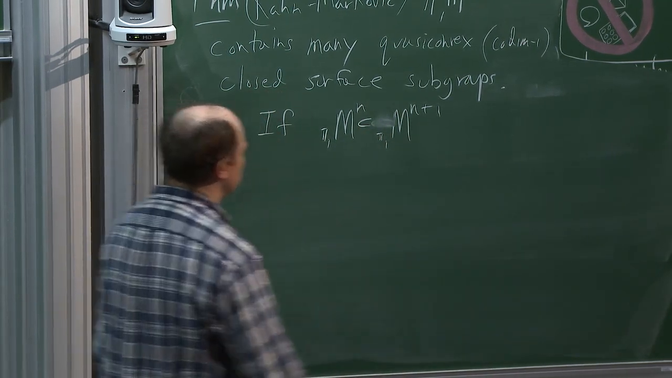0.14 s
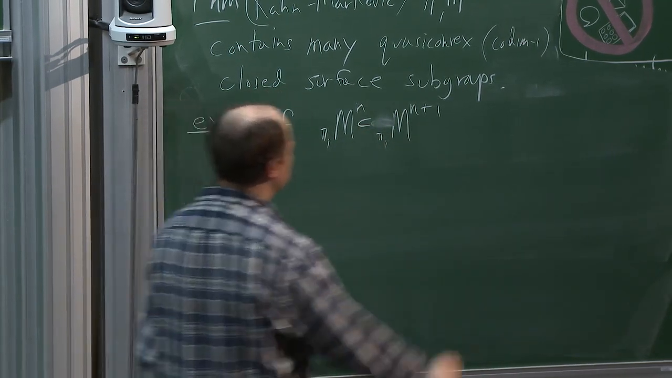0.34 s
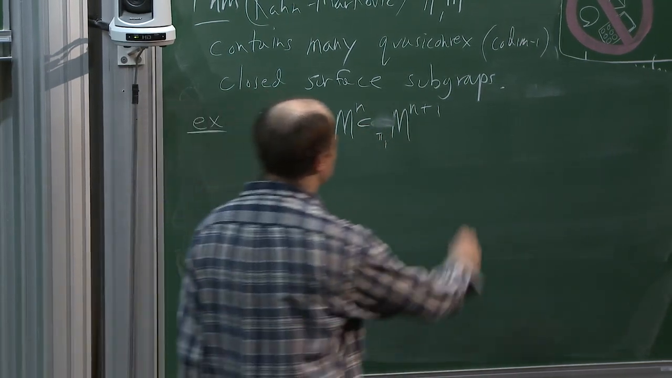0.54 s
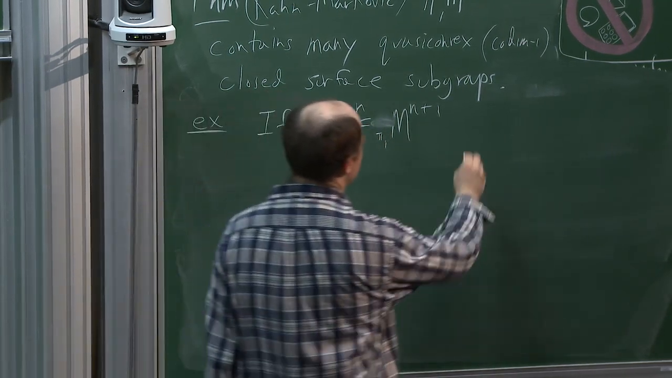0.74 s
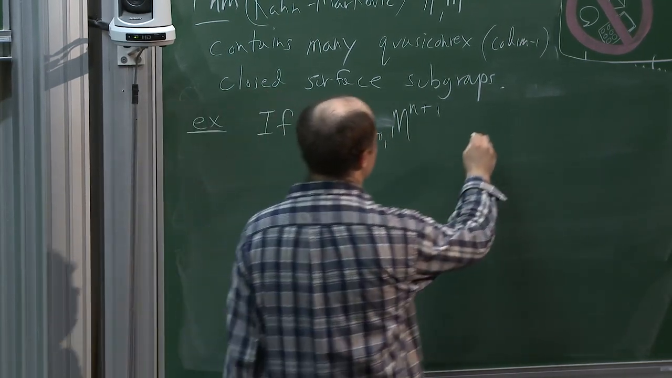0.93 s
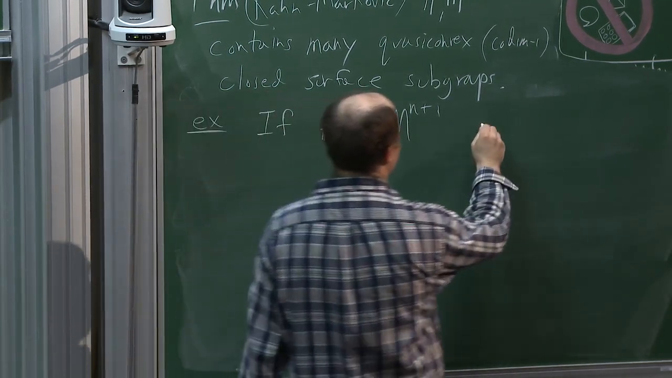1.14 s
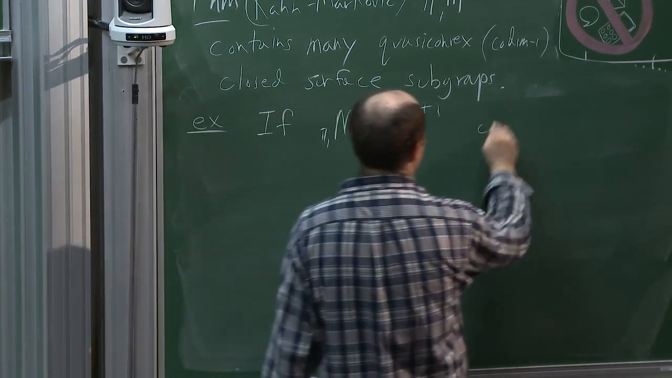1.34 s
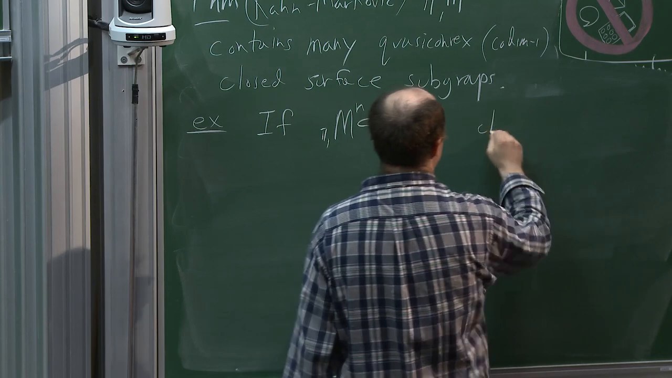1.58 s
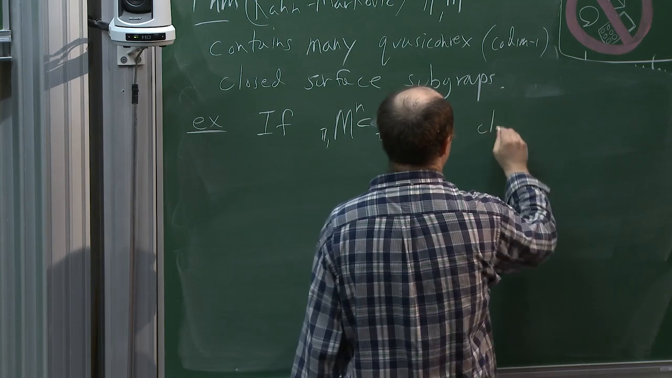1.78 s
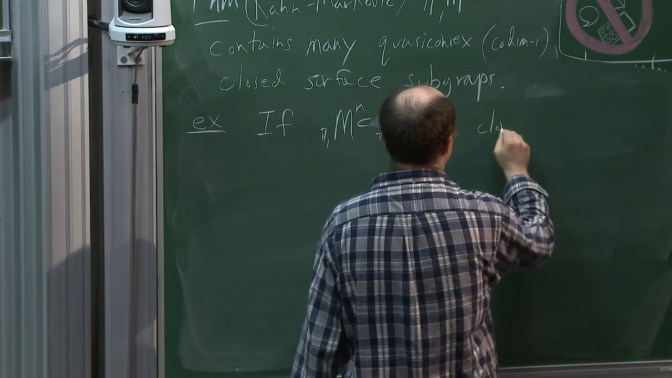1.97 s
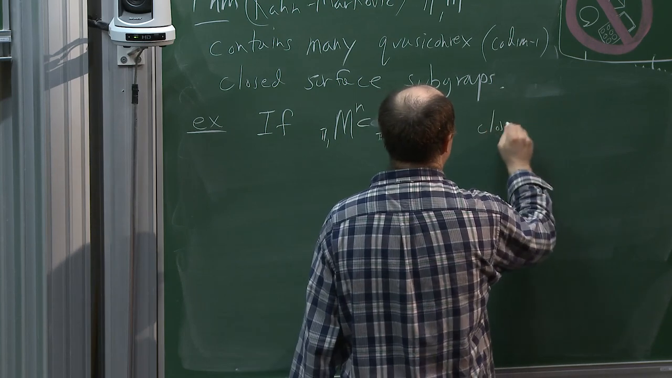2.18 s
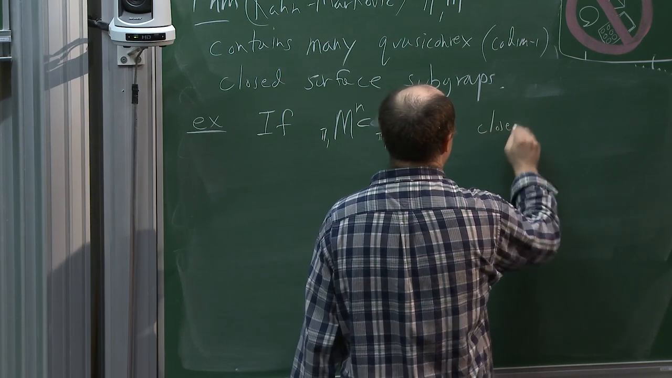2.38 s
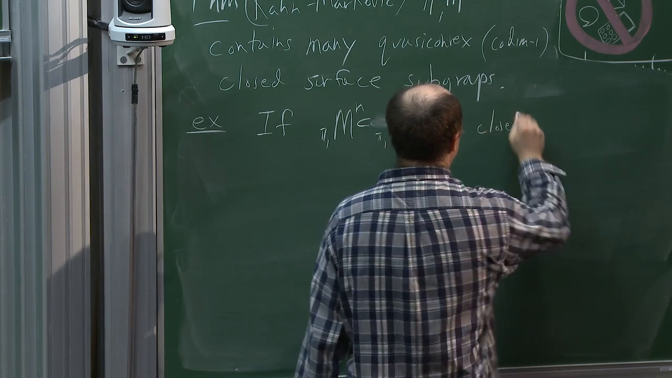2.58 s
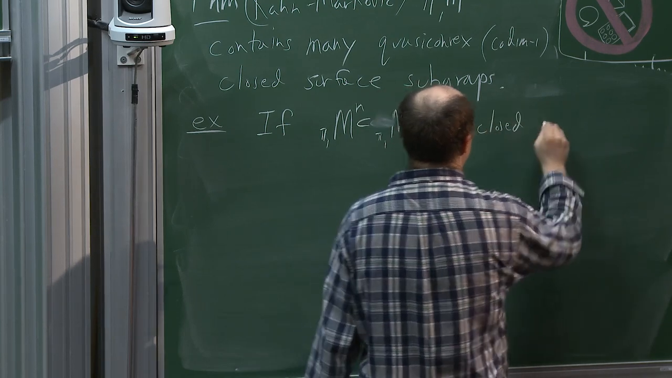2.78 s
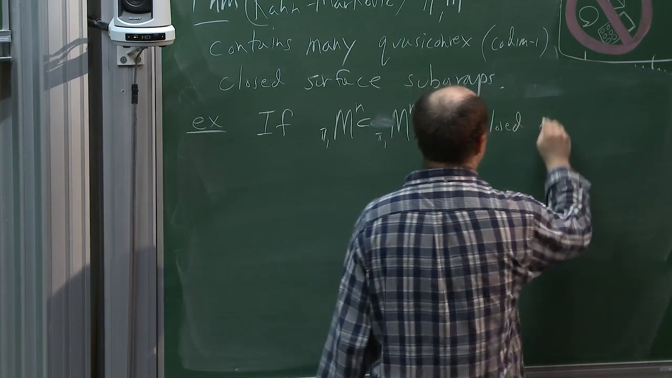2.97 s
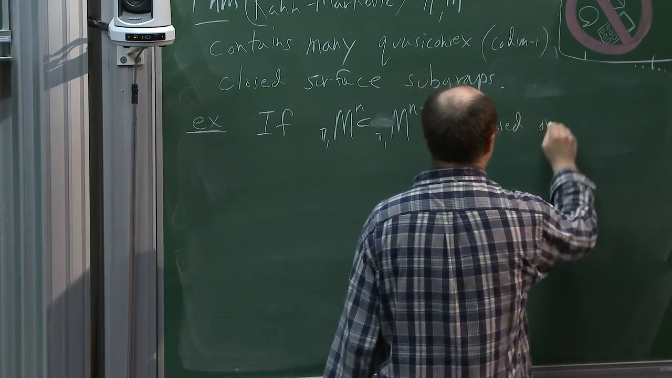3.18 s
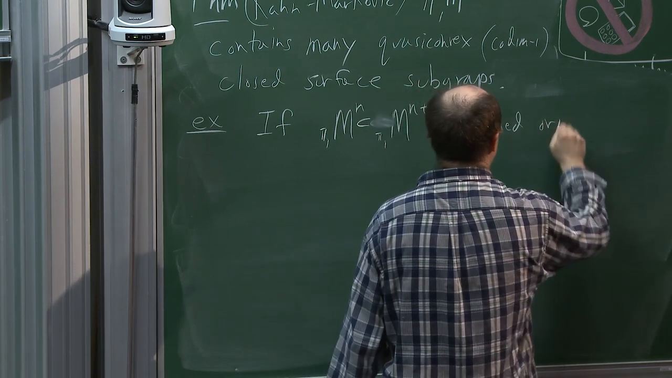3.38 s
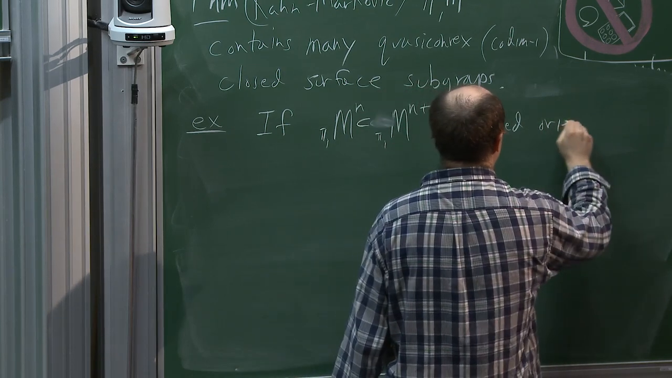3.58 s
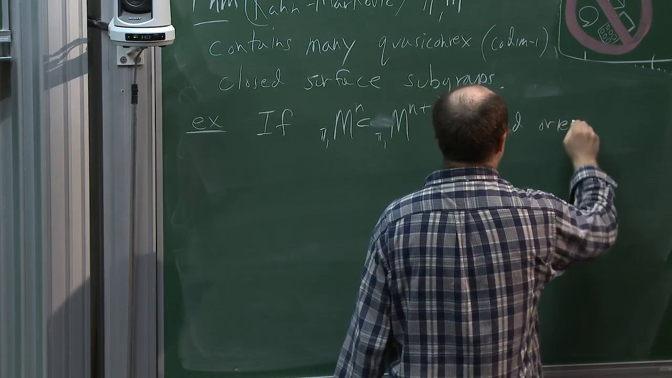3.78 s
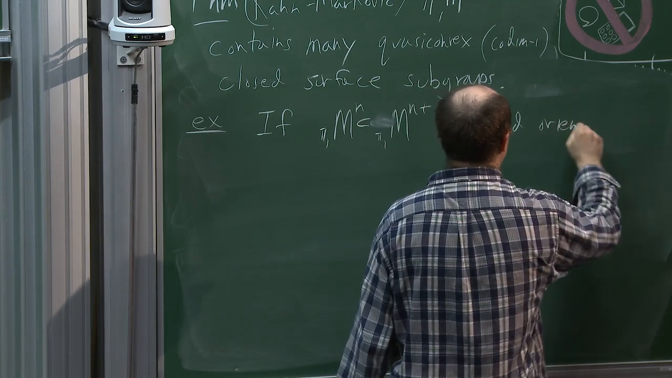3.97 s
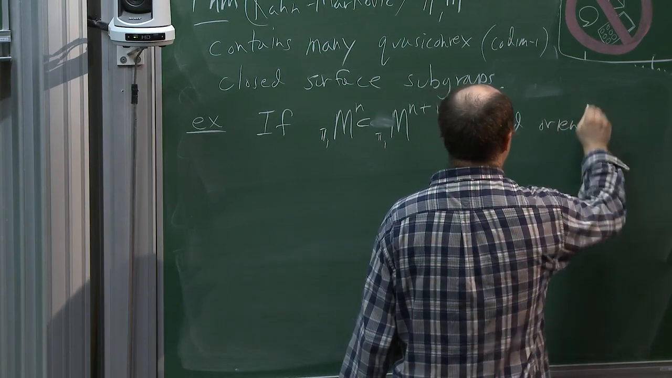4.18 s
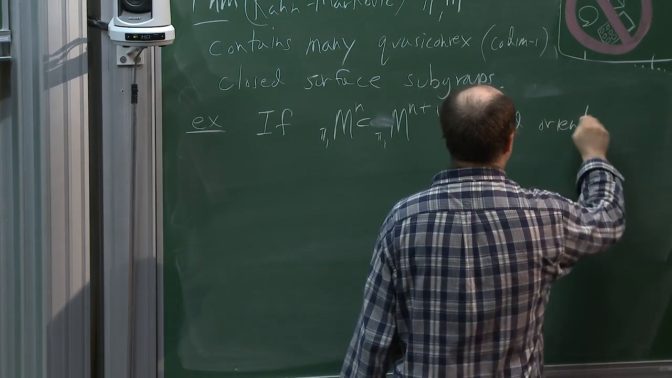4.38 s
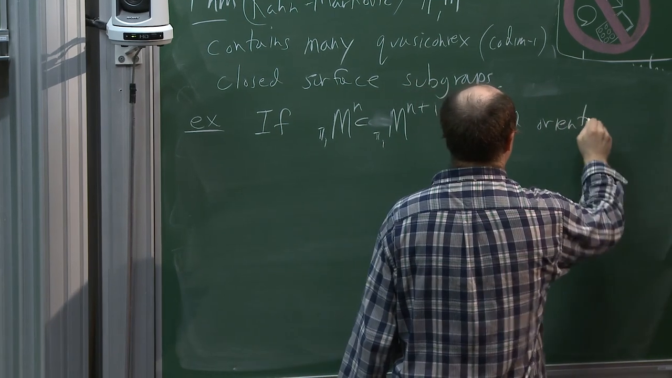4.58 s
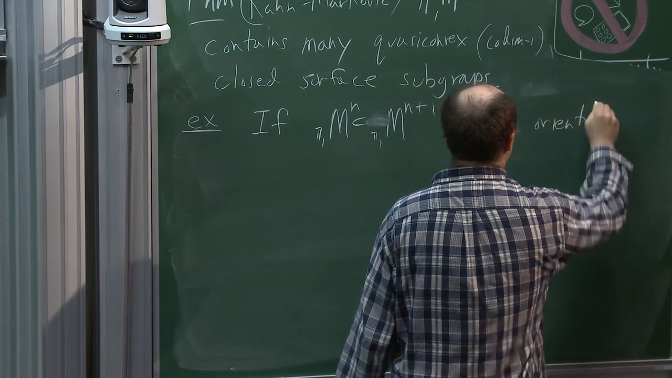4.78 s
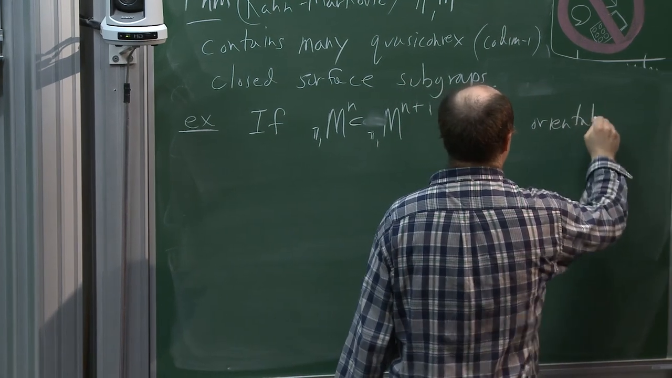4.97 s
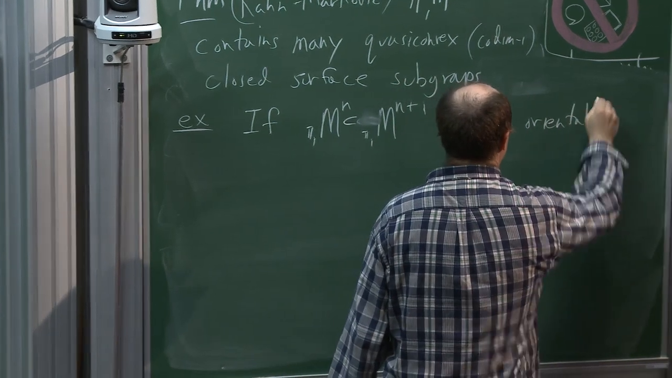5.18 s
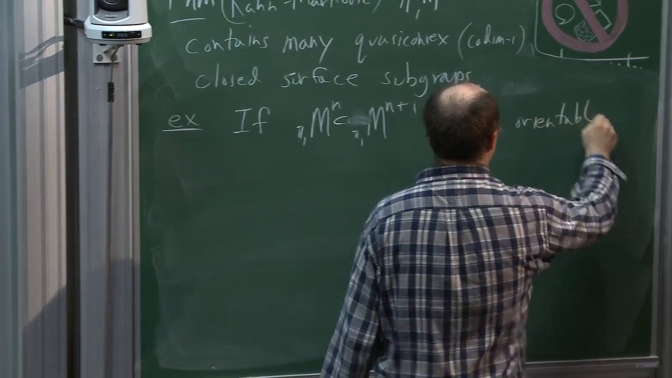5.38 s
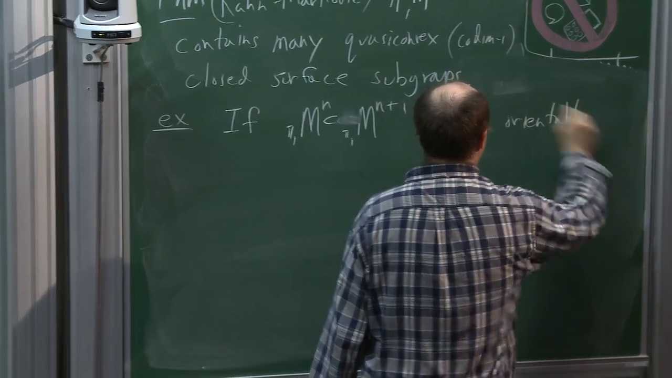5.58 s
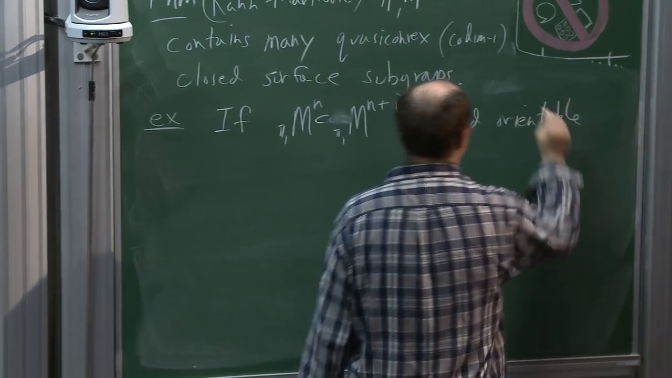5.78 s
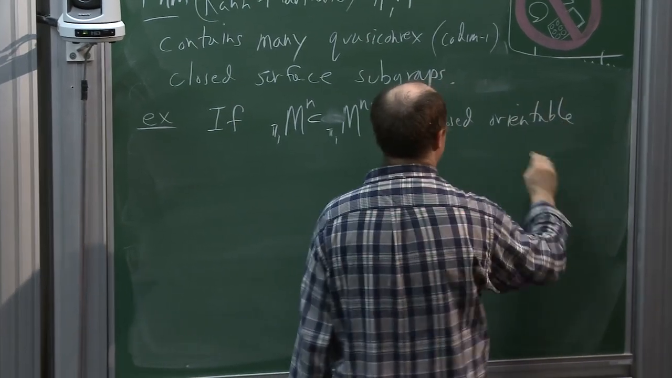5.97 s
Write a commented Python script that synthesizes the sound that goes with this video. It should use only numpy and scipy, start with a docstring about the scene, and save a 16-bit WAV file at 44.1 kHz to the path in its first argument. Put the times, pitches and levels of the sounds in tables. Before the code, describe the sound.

Close-miked handwriting with chalk on a large board. First only low room air, a dull whoosh of cloth and a few fabric bumps. Then sixteen irregular woody taps, some crisp and strong, some soft, with short quiet gritty drags and light flicks as the chalk lifts. A low murmur of the board stays underneath, with stray ticks and faint chirpy squeaks. The room rings briefly after each tap.

```python
"""Chalk on a blackboard

A word is written in a quiet room, heard close by. Landings are damped modes, a bending-wave packet
and its echo, scattered noise and a room tail. The drag is dense random slips filtered into hiss, board
rasp and stick ring. Cloth rumbles, rustles and bumps as the arm rises. Dry ticks, faint squeaks and
low blips are short tones; the still air is coloured noise."""
import sys
import numpy as np
from scipy import signal
from scipy.fft import rfft, irfft
from scipy.io import wavfile

SR = 44100
rng = np.random.default_rng(int(sys.argv[2]) if len(sys.argv) > 2 else 0)


def persist_wave(psi):
    """Save psi, clipped to +-1, as 16-bit WAV."""
    counts = np.round(np.clip(psi, -1, 1) * 32767).astype(np.int16)
    wavfile.write(sys.argv[1], SR, np.atleast_2d(counts).T)


N = 265482
TIME = np.arange(N) / SR
AFTER = TIME[:SR]  # the second after a blow

# chalk contacts: (landing [s], lift [s], strength [dB], bending-wave pitch [Hz],
# relative tip crack [dB], relative drag [dB], relative flick at the lift [dB])
TOUCHES = [(1.2204, 1.40, -21, 1500, -13, -72, -45), (1.5146, 1.68, -12, 1630, 0.5, -68, -48),
           (1.7292, 1.90, -17.5, 1580, 6, -69.5, -51), (1.951, 2.09, -18, 1630, 6.5, -71.5, -50),
           (2.148, 2.365, -17, 1540, 3.5, -73, -45.5), (2.4178, 2.718, -17, 1530, -2, -66, -38.5),
           (2.8945, 3.07, -13.5, 1505, -3, -70.5, -51), (3.1178, 3.33, -21, 1604, 3.5, -71.5, -46.5),
           (3.4109, 3.52, -17, 1460, -2.5, -75, -62), (3.5766, 3.81, -19.5, 1480, -3, -73.5, -46),
           (3.8535, 4.09, -21, 1600, 2, -74.5, -49.5), (4.2124, 4.39, -16, 1510, -3.5, -71.5, -60),
           (4.4147, 4.76, -30.5, 1430, -24, -73, -51), (4.8658, 5.177, -14, 1570, 5, -69, -46),
           (5.2741, 5.58, -12.5, 1590, 3.5, -68, -41.5), (5.7141, 5.86, -7, 1546, -3, -78, -56)]
# spectrum of waves scattered within the board: (frequency [Hz], relative level [dB])
SCATTER = [(100, -16.5), (400, -10.5), (850, -10.5), (1150, 0.5), (1400, 2.5), (1900, -4.5), (2300, -8.5),
           (3500, -23), (8000, -37), (16000, -82.5)]


def undb(db):
    """Decibels to gain."""
    return 10 ** (np.asarray(db) / 20)


def unit(x):
    """Scale to rms 1."""
    return x / np.sqrt(np.mean(x ** 2))


def add(track, start_s, x):
    """Mix x into the track from start_s on."""
    i = max(int(round(start_s * SR)), 0)
    track[i:i + len(x)] += x[:N - i]


def log_axis(n, hz):
    """Log frequency of the bins of n samples, and of the given points."""
    bins_hz = np.arange(n // 2 + 1) * SR / n
    return np.log(bins_hz + 1), np.log(hz)


def colour(x, points):
    """Weight the spectrum of x by (Hz, dB) points, then scale to rms 1."""
    hz, db = np.transpose(points)
    bins, knots = log_axis(len(x), hz)
    gain = undb(np.interp(bins, knots, db))
    return unit(irfft(rfft(x) * gain, len(x)))


def noise(n, points):
    """Coloured noise at rms 1."""
    return colour(rng.standard_normal(n), points)


def fade(t60_s):
    """Exponential decay: 60 dB in t60_s."""
    return undb(-60 * AFTER / t60_s)


def ring(hz, t60_s):
    """One struck mode: a damped sine."""
    return np.sin(2 * np.pi * hz * AFTER) * fade(t60_s)


def swell(rise_ms):
    """Smooth build-up after a blow."""
    return 1 - np.exp(-(1000 * AFTER / rise_ms) ** 2)


def flutter(per_s):
    """Random wander at rms 1: straight lines between per_s random points a second."""
    return unit(np.interp(TIME * per_s, np.arange(N), rng.standard_normal(N)))


def grit(per_s, spread_db):
    """Dense tiny slips of random timing, sign and size."""
    slips = rng.random(N) < per_s / SR
    size_db = spread_db * np.minimum(rng.exponential(size=N), 5)
    return slips * rng.standard_normal(N) * undb(size_db)


def gesture(middle_s, half_s, db):
    """Gaussian level of a movement that gathers speed and comes to rest."""
    return undb(db) * np.exp(-((TIME - middle_s) / half_s) ** 2)


def still_air():
    """Steady coloured noise of the quiet room."""
    # (frequency [Hz], relative level [dB])
    air_spectrum = [(20, 5), (60, -4.5), (150, -6.5), (300, -16.5), (800, -18.5), (1150, -17), (1700, -23),
                    (3000, -24), (6000, -26), (10000, -29.5), (16000, -32.5)]
    return undb(-69.5) * noise(N, air_spectrum)


def shirt():
    """Rubbing cloth: low rumble and gritty rustle follow the arm; bumps are damped low modes."""
    # sleeve swishes: (middle [s], half length [s], relative level [dB])
    swishes = [(0.485, 0.052, -69.5), (.76, 0.077, -70), (0.936, 0.13, -70), (1.17, 0.044, -69)]
    # cloth bumping the microphone: (time [s], relative level [dB], frequency [Hz], t60 [s])
    bumps = [(0.5132, -44.5, 199, 0.047), (0.524, -35.5, 406, 0.0092), (0.5289, -30, 92, 0.042),
             (1.109, -33, 278, 0.0095), (1.11, -48.5, 34.8, 0.13)]
    # rustle spectrum: (frequency [Hz], relative level [dB])
    cloth_spectrum = [(200, -1), (600, -1), (1200, -1), (2000, -4.5), (4500, -9), (8000, -16), (14000, -36)]
    stir_db = -78  # the cloth never lies quite still
    rumble = noise(N, [(20, -12.0), (55, -1.5), (80, 0), (150, -10), (300, -27.0), (1000, -53.0)])
    rustle = colour(grit(per_s=16000, spread_db=2.5), cloth_spectrum) * undb(1.1 * flutter(per_s=35))
    rubbing = undb(stir_db) + sum(gesture(*swish) for swish in swishes)
    swing = gesture(middle_s=0.39, half_s=0.086, db=-60)
    out = rumble * (swing + undb(-2.5) * rubbing) + rustle * rubbing
    for time_s, db, hz, t60_s in bumps:
        add(out, time_s, undb(db) * ring(hz, t60_s) * swell(rise_ms=400 / hz))
    return out


def dry_ticks():
    """Tiny 1 ms rings near the microphone, band-passed and without a room tail."""
    # (time [s], level ahead of the band-pass [dB])
    tick_list = [(1.1086, -18.5), (2.099, -34), (3.2708, -30), (4.208, -35), (4.428, -31), (4.636, -42),
                 (4.8282, -34.5), (5.0401, -30), (5.2352, -33), (5.641, -33.5), (5.9018, -30.5)]
    out = np.zeros(N)
    for time_s, db in tick_list:
        add(out, time_s, undb(db) * ring(hz=2520, t60_s=0.001))
    band = signal.butter(5, [1400, 5100], "band", fs=SR, output="sos")
    return signal.sosfilt(band, out)


def room_tail():
    """Diffuse reverberation: overlapping noise bands, each with its own decay."""
    # (frequency [Hz], relative level [dB], t60 [s])
    room_bands = [(29.35, -2.5, 0.89), (82.7, -3, 0.74), (167, -1, 0.93), (242, -1, 0.48), (446, -10, 0.46),
                  (833, -5, 0.41), (1310, 6, 0.26), (2000, -2, 0.35), (2440, -13, 0.47),
                  (3800, -24.5, 0.62), (5070, -16, 0.36), (8000, -35, 0.078), (16000, -39.5, 0.24)]
    hz, db, t60_s = np.transpose(room_bands)
    spectrum = rfft(noise(SR, np.column_stack([hz, db])))
    bins, knots = log_axis(SR, hz)
    tail = np.zeros(SR)
    for band, band_t60_s in zip(np.eye(len(hz)), t60_s):
        share = np.interp(bins, knots, band)
        tail += irfft(spectrum * share, SR) * fade(band_t60_s)
    return tail


def bending_wave(hz, arrive_ms, width_ms, droop_per_ms):
    """A short wave packet; high tones travel faster in a plate, so its pitch falls as it passes."""
    ms = 1000 * AFTER - arrive_ms
    cycles = hz * ms / 1000 * (1 - droop_per_ms * ms)
    return np.exp(-(ms / width_ms) ** 2) * np.cos(2 * np.pi * cycles)


def tap(strength_db, hz, crack_db):
    """One landing: the tip cracks, the board knocks, its bending wave passes, returns and scatters."""
    # board modes under a blow:
    # (frequency [Hz], relative level before the random shift [dB], t60 [s])
    board_modes = [(24, -25, 0.12), (86.5, -57.5, .7), (122.65, -39, 0.38), (199, -19, .035),
                   (233, -52.5, 0.29), (376, -38, 0.089), (557.5, -35.5, 0.068), (638, -24.5, 0.06),
                   (1276, -8, 0.0026), (1314, -38.5, 0.24), (1384, -37, 0.44), (1573, -25, 0.073),
                   (2640, -23.5, 0.015), (4930, -34, 0.021), (7170, -25, 0.0019)]
    # crushing of the chalk tip: (frequency [Hz], relative level [dB])
    crack_spectrum = [(500, 8), (2500, 8.5), (4200, 1), (6000, -3.5), (7400, 1), (9500, -10.5),
                      (13000, -14), (16000, -39.5)]
    # each spot of the board favours other modes
    spot_db = 3 * rng.uniform(-1.2, 1, len(board_modes))
    knock = np.zeros(SR)
    for (mode_hz, db, t60_s), shift_db in zip(board_modes, spot_db):
        knock += undb(db + shift_db) * ring(mode_hz, t60_s)

    arrive_ms = 2.35
    echo_ms = 1.0 * np.exp(0.067 * rng.standard_normal())  # differs a little at every spot
    wave = bending_wave(hz, arrive_ms, width_ms=0.74, droop_per_ms=0.078)
    echo = undb(-11.5) * bending_wave(hz, arrive_ms + echo_ms, width_ms=0.94, droop_per_ms=0.02)
    scatter = undb(-10.0) * noise(SR, SCATTER) * fade(0.049) * swell(rise_ms=2.6)
    crack_fade = fade(.022) + undb(-11.0) * fade(0.19)
    crack = undb(crack_db - 22) * noise(SR, crack_spectrum) * crack_fade
    room = undb(-25.5) * room_tail() * swell(rise_ms=2.5)
    blow = knock + undb(0.5) * (wave + echo) + scatter + crack + room

    # the weight of the hand sets the bass; it counts for less in a sharper landing
    usual_db, thud_db, thud_per_db = -16, 1, -.5
    bass_db = thud_db + thud_per_db * (strength_db - usual_db)
    bass = signal.sosfilt(signal.butter(1, 450, fs=SR, output="sos"), blow)
    return undb(strength_db) * (blow + (undb(bass_db) - 1) * bass)


def taps():
    """Landings of the chalk, and at each lift a short scuff of scattered board waves."""
    flick_lead_s, flick_rise_ms, flick_t60_s = 0.023, 10.3, 0.081
    out = np.zeros(N)
    for landing_s, lift_s, strength_db, hz, crack_db, _, flick_db in TOUCHES:
        add(out, landing_s, tap(strength_db, hz, crack_db))
        scuff = undb(-4.5) * noise(SR, SCATTER) * fade(flick_t60_s) * swell(flick_rise_ms)
        add(out, lift_s - flick_lead_s, undb(flick_db) * scuff)
    return out


def strokes():
    """Speed arches from corner to corner; the slips hiss, ring the stick and shake the board."""
    # the chalk slows to turn a corner of a letter: time [s]
    turns = [1.246, 1.823, 2.226, 2.501, 2.62, 2.685, 2.96, 3.185, 3.619, 3.946, 4.57, 4.645, 4.985, 5.133,
             5.522]
    # hiss of the grit: (frequency [Hz], relative level [dB])
    hiss_spectrum = [(1000, -38), (2800, 1.5), (4500, -2), (6100, -11), (7400, -1), (10000, -2),
                     (13000, -5.5), (16000, -12.5)]
    # rasp of the board: (frequency [Hz], relative level [dB])
    rasp_spectrum = [(60, -4.5), (200, 4), (450, -4), (850, -9.5), (1400, -2.5), (1900, -4), (2600, -15.5),
                     (6000, -43)]
    overlap_s = 0.0066  # rounded corners: the legs of a letter overlap
    ease_db_per_s = -12  # the hand eases off through a letter
    drag, stick = np.zeros((2, N))
    # the pressure is never even
    slips = grit(per_s=7000, spread_db=1) * undb(1.5 * flutter(per_s=50))
    for landing_s, lift_s, *_, drag_db, _ in TOUCHES:
        corners = [landing_s] + [s for s in turns if landing_s < s < lift_s] + [lift_s]
        for start_s, end_s in zip(corners, corners[1:]):
            end_s = min(end_s + overlap_s, lift_s)
            speed = np.hanning(max(int((end_s - start_s) * SR), 3)) ** 0.31
            since_landing_s = start_s - landing_s + TIME[:len(speed)]
            pressure = undb(drag_db + ease_db_per_s * since_landing_s)
            add(drag, start_s, pressure * speed)
            # the grip and the angle of the stick set where it rings
            stick_hz = 9000 * np.exp(0.066 * rng.standard_normal())
            b, a = signal.iirpeak(stick_hz, 7.5, SR)
            leg_slips = slips[int(start_s * SR):][:len(speed)]
            rung = unit(signal.lfilter(b, a, leg_slips))
            add(stick, start_s, undb(-10.5) * pressure * speed * rung)
    hiss = undb(1.5) * colour(slips, hiss_spectrum)
    rasp = undb(6) * colour(slips, rasp_spectrum)
    direct = drag * (hiss + rasp) + stick
    tail = room_tail()
    return direct + undb(-18) * signal.fftconvolve(direct, tail / np.linalg.norm(tail))[:N]


def board_rumble():
    """The pressing hand keeps low modes murmuring: fades in over the first two landings, then stays."""
    writing = np.interp(TIME, [TOUCHES[0][0], TOUCHES[1][0]], [0, 1])
    murmur = noise(N, [(20, 3.5), (60, -3.5), (85, -0.5), (170, -5), (250, -6.0), (350, -26.5),
                       (1500, -56.5)])
    return undb(-68.0) * writing * murmur * undb(2.2 * flutter(per_s=45))


def glide(hz, length_s, fall):
    """A short soft tone whose pitch sinks by the fraction fall, centred on hz."""
    along = np.linspace(0, 1, int(length_s * SR))
    pitch_hz = hz * (1 + fall * (.5 - along))
    return np.hanning(len(along)) * np.sin(2 * np.pi * np.cumsum(pitch_hz) / SR)


def small_tones():
    """Runs of faint quick squeaks, and a few soft low blips: falling sines."""
    # squeak runs: (reference time, 8 ms after the first onset [s], count, level [dB])
    squeak_runs = [(4.355, 2, -67), (4.491, 3, -67.5), (4.704, 3, -68.5), (5.949, 2, -67.5)]
    # blips: (middle [s], frequency [Hz], level [dB])
    low_blips = [(3.99, 213, -57), (4.571, 300, -59), (5.171, 336, -61.5)]
    out = np.zeros(N)
    for run_s, count, db in squeak_runs:
        for k in range(int(round(count))):
            add(out, run_s + k * .037 - .008, undb(db) * glide(2814, length_s=0.0175, fall=0.24))
    blip_s = .07
    for middle_s, hz, db in low_blips:
        add(out, middle_s - blip_s / 2, undb(db) * glide(hz, blip_s, fall=0.083))
    return out


def scene():
    """Writing, clothing and small sounds over the still air of the room."""
    cloth_and_ticks = shirt() + dry_ticks()
    writing = taps() + strokes() + board_rumble()
    return (still_air() + cloth_and_ticks + writing + small_tones())[None]


def record(dry):
    """The recorder cuts the top: steep low-pass at 16 kHz."""
    low_pass = signal.ellip(10, .2, 70, 16000, fs=SR, output="sos")
    return signal.sosfilt(low_pass, dry)


dry = scene()
out = record(dry)
persist_wave(out)
```